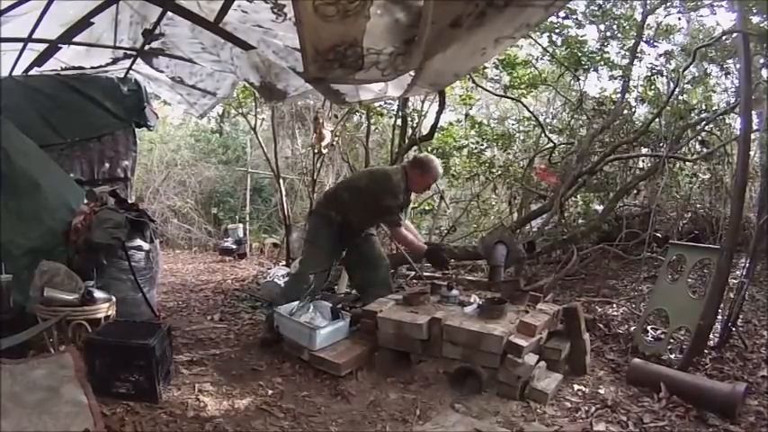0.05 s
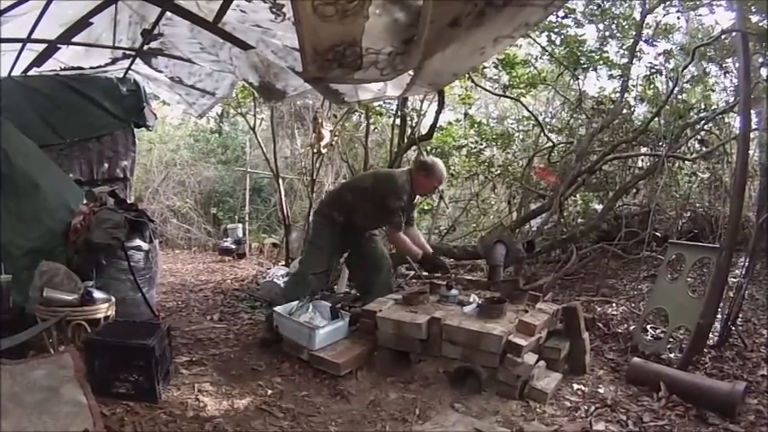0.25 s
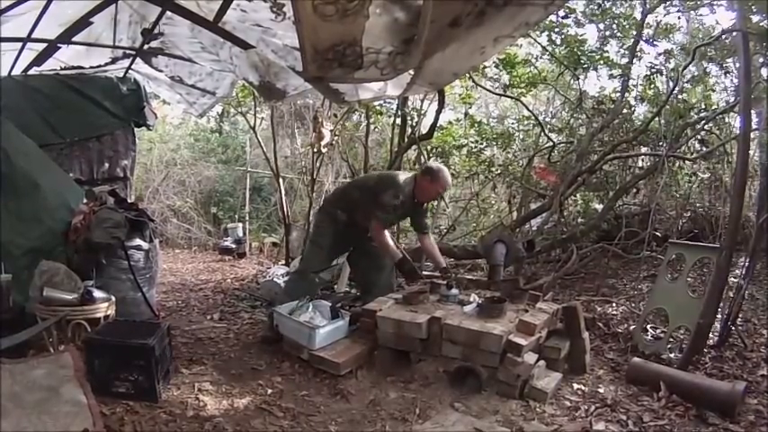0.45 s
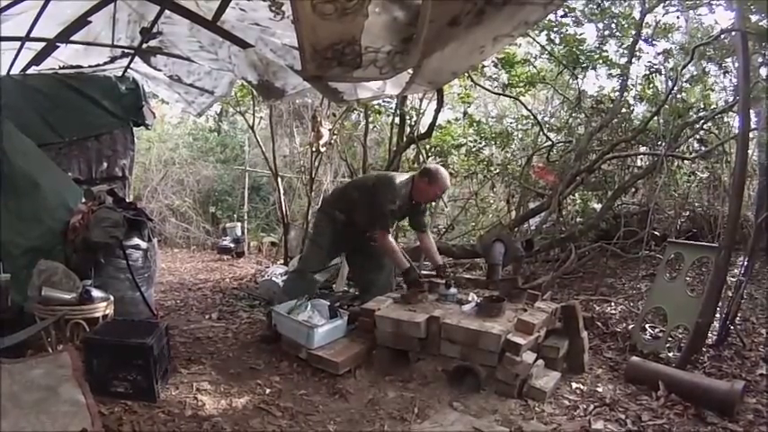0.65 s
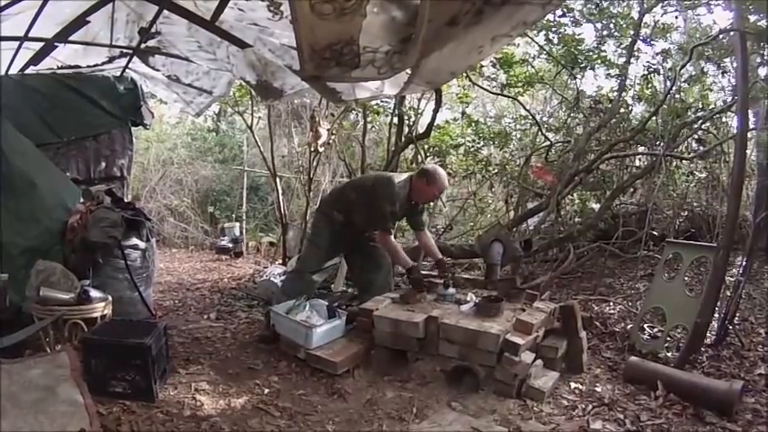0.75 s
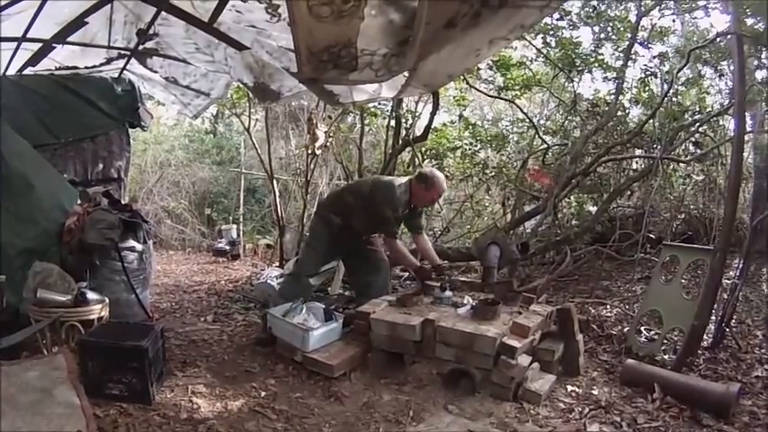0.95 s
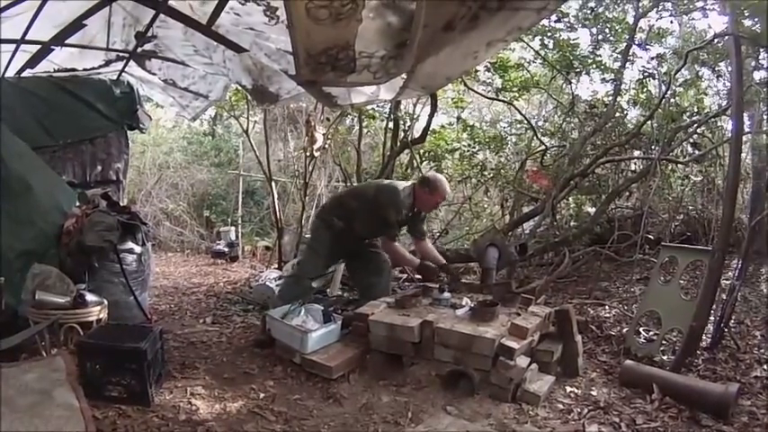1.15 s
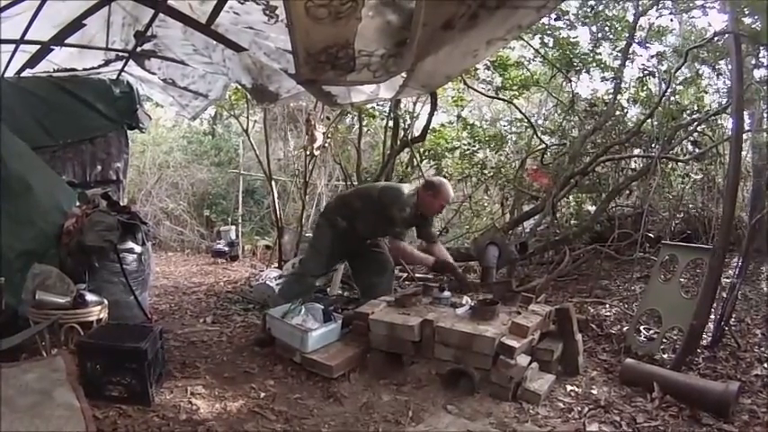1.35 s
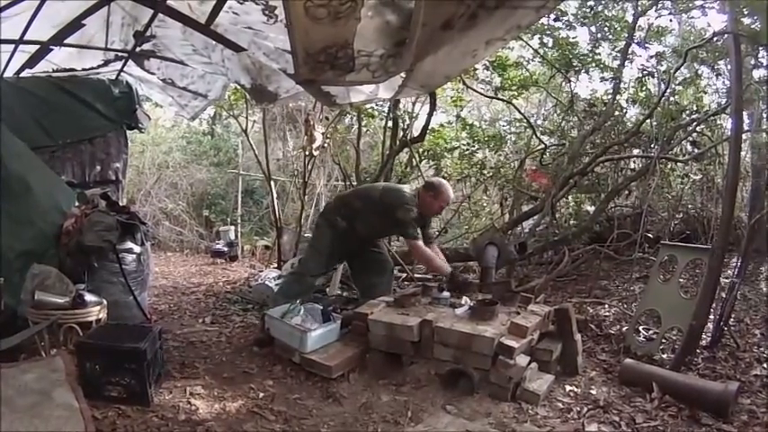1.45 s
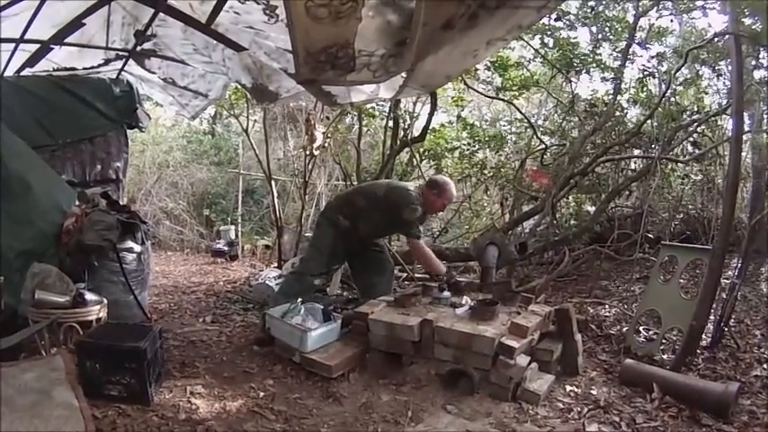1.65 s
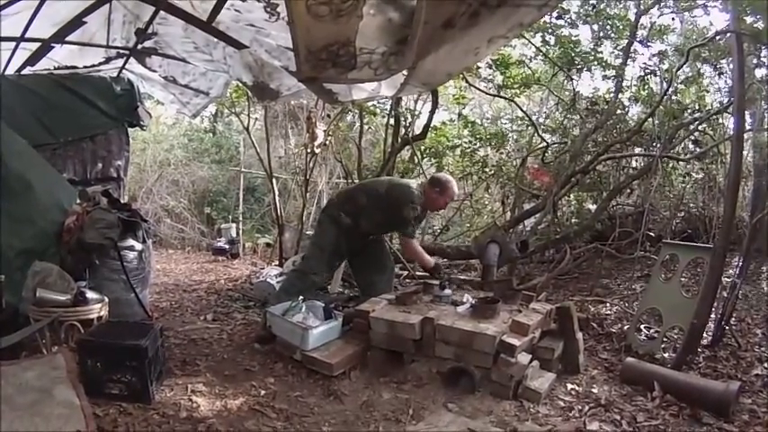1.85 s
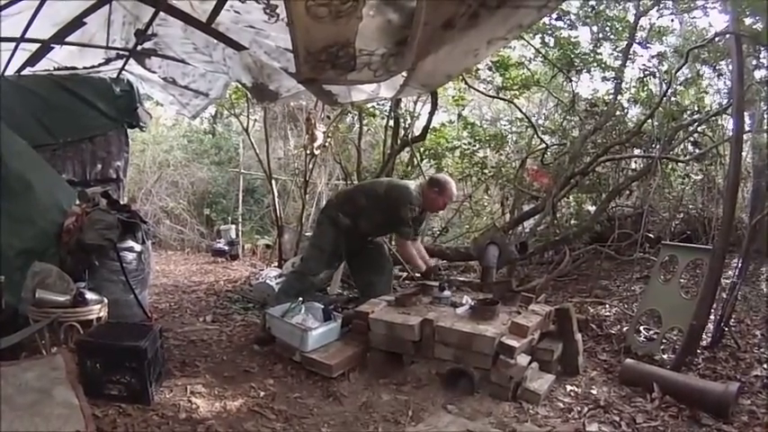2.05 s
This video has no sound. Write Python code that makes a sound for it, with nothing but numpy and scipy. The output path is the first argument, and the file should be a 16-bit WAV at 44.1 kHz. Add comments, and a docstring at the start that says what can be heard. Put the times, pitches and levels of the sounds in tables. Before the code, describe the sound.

A tool strikes brickwork once with a dry, hollow clack over faint outdoor rush.

```python
"""A knock on clay and brick

Under a tarpaulin in a wood, a tool strikes hard clay and brick once. Damped modes and crushed grit
give a dry, hollow clack with an instant rebound, scattered briefly by the shelter and the trees.
Cloth and dry litter rustle as the worker shifts, over a low, steady outdoor rush."""
import sys
import numpy as np
from scipy import signal
from scipy.fft import rfft, irfft
from scipy.io import wavfile

SR = 44100
rng = np.random.default_rng(int(sys.argv[2]) if len(sys.argv) > 2 else 0)


def put_to_file(sound):
    """Save the sound as 16-bit audio at rate SR, in the file named by the first command-line argument."""
    columns = np.atleast_2d(sound).T  # one column per channel
    safe = np.clip(columns, -1, 1)
    whole_steps = np.round(safe * 32767)
    wavfile.write(sys.argv[1], SR, whole_steps.astype(np.int16))


N = 92610

# Spectrum of the outdoor rush. Each row: frequency in Hz, relative density in dB.
RUSH_SPECTRUM = [(20, 4), (50, -7), (100, -7.5), (175, -6.5), (280, -8.5), (550, -10), (880, -8.5),
                 (1200, -21), (2000, -21.5), (3500, -26), (6300, -29.5), (7200, -33), (10500, -37.5),
                 (13000, -39), (15000, -42)]
# Course of the low rumble. Each row: time in seconds, level in dB.
RUMBLE_LEVELS = [(0, -79), (.55, -59.5), (1.05, -60.5), (1.6, -62), (1.85, -59), (2.07, -60)]
# Harmonics of the far drone, second to fourth. Each entry: level in dB.
DRONE_LEVELS = [-69.5, -67.5, -75.5]
# Spectrum of rubbing cloth and litter. Each row: frequency in Hz, relative density in dB.
FRICTION_SPECTRUM = [(100, -24), (300, -12), (800, 7), (1300, -3), (2200, 1), (3300, 1.5), (6000, 2.5),
                     (7500, -2.5), (10000, -5.5), (15000, -4.5)]
# The worker's movements. Each row: start, swell and fade in seconds, gain in dB, cutoff in Hz.
RUSTLE_EVENTS = [(0, 0.012, 0.034, -67.5, 12000), (.428, 0.0093, 0.035, -65, 11000),
                 (.46, 0.066, 0.13, -65, 10800), (.70, 0.061, 0.086, -57.5, 6570),
                 (.77, 0.088, 0.097, -57.5, 13000), (.87, 0.048, 0.11, -61.5, 10000),
                 (1.44, 0.13, 0.17, -61, 9000), (1.64, 0.047, 0.11, -67, 5950),
                 (1.71, 0.032, 0.041, -60.5, 6000), (1.77, 0.035, 0.076, -65.5, 9000)]
# Modes of the brickwork. Each row: frequency in Hz, gain in dB, time to fall 60 dB in seconds.
BRICK_MODES = [(281, -26.5, 0.04), (645, -17, 0.013), (800, -7, .02), (960, -17.5, .012), (766, -28, 0.087),
               (1560, -30.5, 0.038), (1840, -29, 0.023), (1985, -27, 0.038), (2306, -30, 0.044),
               (2905, -36.5, .03), (3180, -32, 0.036), (3390, -37.5, .03), (3790, -44.5, 0.043),
               (4500, -38.5, 0.026), (5484, -38.5, .035)]
# Spectrum of crushed grit. Each row: frequency in Hz, relative density in dB.
GRIT_SPECTRUM = [(70, -26), (160, 8), (500, 1), (1200, 1), (2200, 3.5), (3500, -8.5), (5600, -11.5),
                 (7500, -19), (11000, -29), (15000, -34)]
# Spectrum of scatter from shelter and trunks. Each row: frequency in Hz, relative density in dB.
SCATTER_SPECTRUM = [(60, -30), (140, 2.5), (270, -9), (400, -14), (600, 3), (780, 10.5), (1000, -1),
                    (1300, -10), (2000, 1.5), (2600, -16), (3300, -14.5), (5500, -20), (8000, -32),
                    (15000, -45)]
# Spectrum of the wood's reverberation. Each row: frequency in Hz, relative density in dB.
TAIL_SPECTRUM = [(200, 2), (750, 1), (1200, -6), (2000, 0), (4000, -14), (12000, -30)]
# Soft thuds. Each row: time of the peak in seconds, level in dB, frequency in Hz.
THUD_EVENTS = [(0.175, -50, 94), (2.055, -44, 83)]
# Dry snaps. Each row: start in seconds, gain in dB, cutoff in Hz.
SNAP_EVENTS = [(0.435, -54.5, 12000), (.92, -56, 9000), (1.738, -55, 6000)]
# Dull scuffs. Each row: time of the peak in seconds, level in dB, centre frequency in Hz.
SCUFF_EVENTS = [(.76, -57.5, 810), (0.844, -58.5, 805), (1.175, -57.5, 720), (1.44, -56.5, 377),
                (1.711, -50, 270)]

KNOCK_S = .1104


def from_db(db):
    """Amplitude grows tenfold for every 20 dB."""
    return 10 ** (np.asarray(db) / 20)


def rms_one(x):
    """Division by the rms value gives unit power."""
    return x / np.sqrt(np.mean(x ** 2) + 1e-20)


def seconds():
    """Uniform sampling sets the time of each sample."""
    return np.arange(N) / SR


def low_pass(x, hz, order=2):
    """A Butterworth filter attenuates what lies above its cutoff."""
    return signal.sosfilt(signal.butter(order, min(hz, .45 * SR), fs=SR, output="sos"), x)


def noise(spectrum):
    """Spectral weighting colours white noise; the result has unit power."""
    hz, db = np.transpose(spectrum)
    bin_hz = np.maximum(np.arange(N // 2 + 1) * SR / N, 1)
    gain = from_db(np.interp(np.log(bin_hz), np.log(hz), db))
    return rms_one(irfft(rfft(rng.standard_normal(N)) * gain, N))


def flicker(rate_hz, depth_db):
    """Low-passed noise gives a gain for random amplitude modulation."""
    return from_db(depth_db * rms_one(low_pass(rng.standard_normal(N + SR), rate_hz)[SR:]))


def burst(start, rise, t60):
    """A linear rise multiplies an exponential decay of 60 dB in t60 seconds."""
    age = np.maximum(seconds() - start, 0)
    return np.minimum(age / rise, 1) * from_db(-60 * age / t60)


def outdoors():
    """Amplitude modulation, slight for the far rush and deeper for the rumble, makes noise waver."""
    rush = from_db(-54.5) * noise(RUSH_SPECTRUM) * flicker(rate_hz=18, depth_db=.8)
    deep_noise = rms_one(low_pass(noise([(10, -5), (25, 1), (70, -0.5)]), hz=60, order=4))
    rumble_db = np.interp(seconds(), *np.transpose(RUMBLE_LEVELS))
    return rush + deep_noise * flicker(rate_hz=6.7, depth_db=2) * from_db(rumble_db)


def far_drone():
    """Harmonics of an absent fundamental waver in phase and amplitude, like a distant engine."""
    fundamental_hz = 43.9
    out = 0
    for k, db in enumerate(DRONE_LEVELS):
        phase_drift = np.log(flicker(rate_hz=7.6, depth_db=9.5))
        tone = np.sin(2 * np.pi * fundamental_hz * (k + 2) * seconds() + phase_drift)
        out += from_db(db) * np.sqrt(2) * rms_one(tone * flicker(rate_hz=6, depth_db=5))
    return out


def rustles():
    """Friction in cloth and dry litter radiates grainy noise that swells and fades with each move."""
    friction = noise(FRICTION_SPECTRUM) * flicker(rate_hz=300, depth_db=1)
    out = 0
    for start, swell, fade, db, cutoff_hz in RUSTLE_EVENTS:
        envelope = np.interp(seconds() - start, [0, swell, swell + fade], [0, 1, 0])
        out += from_db(db) * envelope * low_pass(friction, cutoff_hz)
    return out


def knock():
    """An impact excites the brick's damped modes and crushes grit; a duller rebound follows."""
    rise_s, rebound_delay_s = .00066, .0056
    t = seconds()
    age = np.maximum(t - KNOCK_S, 0)
    ringing = sum((-1) ** k * from_db(db - 60 * age / t60) * np.sin(2 * np.pi * hz * age)
                  for k, (hz, db, t60) in enumerate(BRICK_MODES))
    blow = -ringing * np.minimum(age / rise_s, 1)
    delayed_blow = np.interp(t - rebound_delay_s, t, blow)
    rebound = -from_db(-2) * low_pass(delayed_blow, hz=1910, order=1)  # pushes the other way
    grit = from_db(-30) * noise(GRIT_SPECTRUM) * burst(KNOCK_S, rise=.00075, t60=.065)
    low_cut = signal.butter(2, 124, "high", fs=SR, output="sos")
    return signal.sosfilt(low_cut, blow + rebound + grit + 1e-18)


def reflections():
    """Dense echoes of the knock merge into decaying noise: brief from nearby, longer from the wood."""
    arrival_s = KNOCK_S + .01005
    near = from_db(-28.5) * noise(SCATTER_SPECTRUM) * burst(arrival_s, rise=.0023, t60=.097)
    far = from_db(-52) * noise(TAIL_SPECTRUM) * burst(arrival_s, rise=.02, t60=.48)
    return near + far


def thuds():
    """Damped low oscillations make soft thuds, partly masked by the rumble."""
    rise_s = .012
    out = 0
    for peak_s, db, hz in THUD_EVENTS:
        envelope = burst(peak_s - rise_s, rise_s, t60=.19)
        out += from_db(db) * envelope * np.sin(2 * np.pi * hz * (seconds() - peak_s))
    return out


def snaps():
    """Noise transients with a sharp onset and rapid decay are heard as dry snaps."""
    friction = noise(FRICTION_SPECTRUM)
    return sum(from_db(db) * burst(start, rise=.0015, t60=.021) * low_pass(friction, cutoff_hz)
               for start, db, cutoff_hz in SNAP_EVENTS)


def scuffs():
    """One broad resonance colours the noise of each short, dull rub."""
    sigma_s, log_half_width = .017, .16
    out = 0
    for peak_s, db, hz in SCUFF_EVENTS:
        edges_hz = hz * np.exp([-log_half_width, log_half_width])
        band = signal.butter(1, edges_hz, "band", fs=SR, output="sos")
        rub = rms_one(signal.sosfilt(band, signal.sosfilt(band, rng.standard_normal(N))))
        out += from_db(db) * rub * np.exp(-.5 * ((seconds() - peak_s) / sigma_s) ** 2)
    return out


def scene():
    """By superposition, the pressures of all sources add at one microphone."""
    events = knock() + reflections() + rustles() + snaps() + scuffs() + thuds()
    return (events + outdoors() + far_drone())[None]


def record(dry):
    """A steep elliptic low-pass filter removes the highest treble."""
    cutoff_hz = 15250
    return signal.sosfilt(signal.ellip(12, .1, 80, cutoff_hz, fs=SR, output="sos"), dry)


dry = scene()
out = record(dry)
put_to_file(out)
```